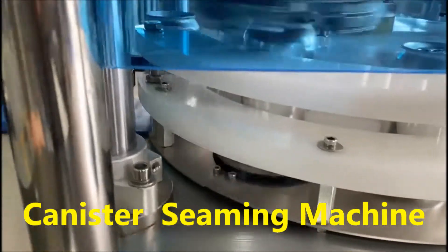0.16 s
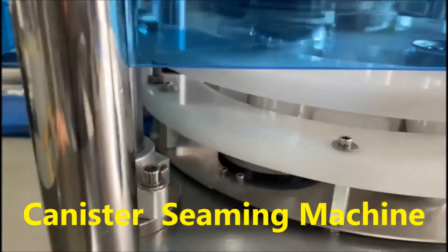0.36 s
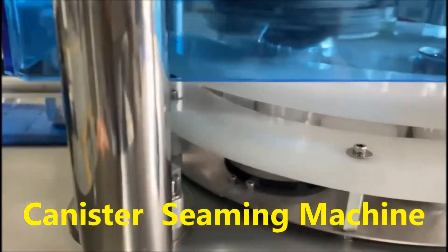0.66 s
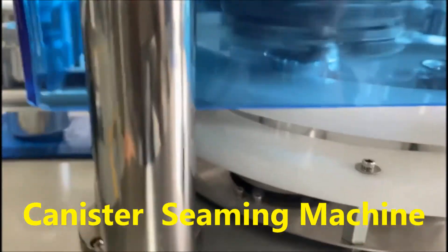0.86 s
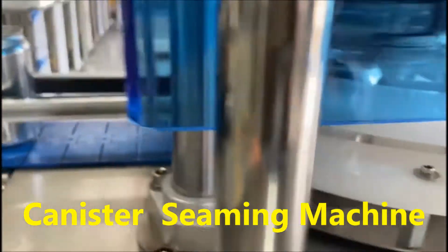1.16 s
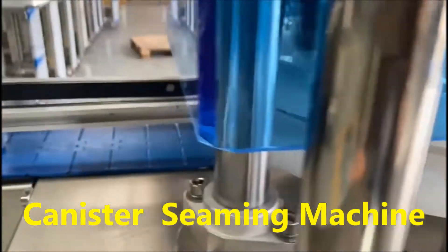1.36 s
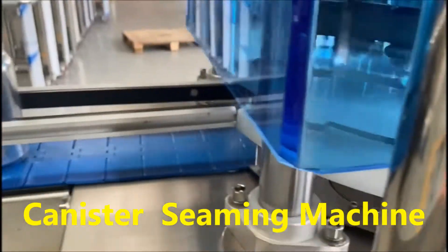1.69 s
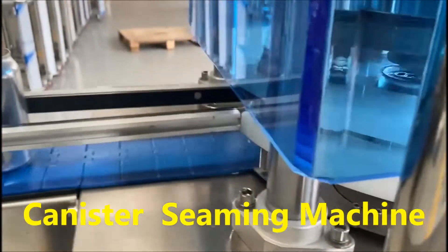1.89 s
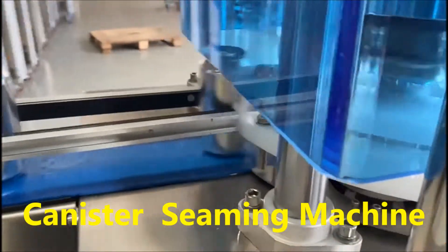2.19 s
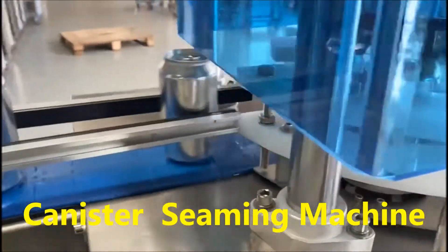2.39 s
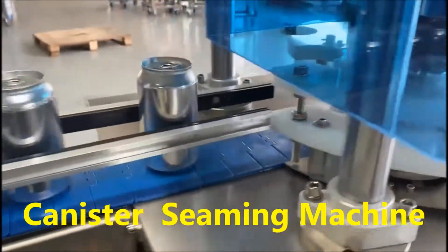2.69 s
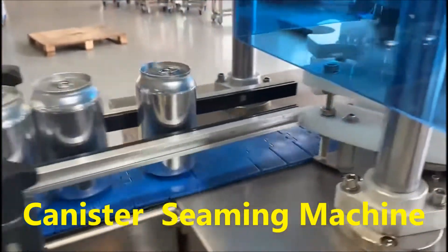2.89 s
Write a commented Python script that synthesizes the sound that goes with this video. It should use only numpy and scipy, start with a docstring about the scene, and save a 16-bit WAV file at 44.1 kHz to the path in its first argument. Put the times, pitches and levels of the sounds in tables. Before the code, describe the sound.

A can seaming machine hums and rattles up close, with an air blast and metallic clanks

```python
"""A can seaming machine runs in a factory hall, heard from close by.
Throughout, a motor hums in sines, the drive drones as resonant noise and a tone, and the conveyor
rattles and hisses in noise. Thuds and clanks of cans and steel parts open the scene as struck bursts.
After a second a valve squeaks and blasts air, noise with exhaust resonances and a sagging whistle;
a thick run of clanks follows, then a thump, and near the end a softer thump, blast and squeak."""
import sys
import numpy as np
from scipy import signal
from scipy.fft import rfft, irfft
from scipy.io import wavfile
from scipy.ndimage import uniform_filter1d, map_coordinates

SR = 44100
rng = np.random.default_rng(int(sys.argv[2]) if len(sys.argv) > 2 else 0)


def unload_wav(signal):
    """Save mono or channel-first audio to the path in sys.argv[1] as 16-bit WAV at rate SR, clipped to [-1, 1]."""
    wavfile.write(
        sys.argv[1],
        SR,
        np.round(np.clip(np.atleast_2d(signal).T, -1, 1) * 32767).astype(np.int16),
    )


N = 134505
TIME, FREQ = np.arange(N) / SR, np.fft.rfftfreq(N, 1 / SR)

# blows of cans and steel parts: start_s, crash_level_db, strongest_hz, crash_t60_s,
# crack_level_db, ring_level_db (the ring is trimmed further in pings)
CLANK_BLOWS = [(0.144, -27, 870, 0.071, -26, -49), (0.182, -31, 760, 0.06, -30, -50),
               (.460, -40, 2100, 0.091, -33, -37.5), (0.638, -48, 2500, 0.053, -42, -46),
               (0.929, -32, 2330, 0.065, -42, -36), (1.026, -33, 1950, 0.49, -58, -41),
               (1.069, -17.5, 1100, 0.03, -17, -36), (1.071, -20, 4670, 0.052, -13.5, -50),
               (1.145, -27, 800, 0.055, -14, -44), (1.431, -40, 2180, 0.42, -44, -49),
               (1.574, -35, 2570, 0.13, -40, -32.5), (1.597, -25, 2420, 0.16, -15, -35),
               (1.601, -34, 5270, 0.11, -28.5, -33), (1.603, -31, 600, 0.086, -24, -50),
               (1.614, -29.5, 3050, 0.25, -22, -28.5), (1.648, -44, 4240, .12, -32, -30),
               (1.701, -28, 680, 0.09, -16, -44), (1.704, -21, 3880, 0.087, -24, -26),
               (1.753, -41, 3600, 0.15, -38, -37), (1.798, -39, 3770, 0.054, -33, -56),
               (1.906, -31.5, 650, 0.044, -23, -44), (2.001, -25.5, 1050, 0.11, -24.5, -21),
               (2.320, -42.5, 2180, 0.18, -49, -45), (2.619, -42, 2270, 0.059, -30, -38.5),
               (2.78, -32.5, 2610, 0.1, -41, -41), (2.926, -40, 985, 0.067, -34, -46),
               (2.957, -41, 1210, 0.16, -24.5, -44)]
# modes the steel rings with: mode_hz, width_hz, relative_level_db, t60_s
STEEL_MODES = [(1040, 61, 8, 0.063), (2180, 68, 12, 0.17), (2450, 56, 0.5, 0.29), (2730, 74, 10, 0.052),
               (2900, 60, 7.5, 0.13), (3240, 43, 2, .16), (3742, 38, 8, 0.24), (3880, 90, 2, 0.045),
               (4630, 76, -7, 0.093), (4800, 80, -5, 0.069), (5420, 85, 11.5, 0.18)]
# spectrum of escaping air and high hiss: frequency_hz, relative_level_db
HISS_SPECTRUM = [(1000, -2.5), (3000, 7.5), (5400, 7.5), (7500, 6.5), (9500, 1), (11000, 1), (14000, -2.5),
                 (16000, -5)]


def amp(db):
    """Decibels to gain."""
    return 10 ** (np.asarray(db) / 20)


def unit(x):
    """Scales to rms 1."""
    return x / np.sqrt(np.mean(x ** 2) + 1e-20)


def at_hz(points, hz=FREQ):
    """Reads a table on a log-frequency axis."""
    f, value = np.transpose(points)
    return np.interp(np.log(hz + 1), np.log(f + 1), value)


def over_time(points):
    """Reads a table along the time axis."""
    return np.interp(TIME, *np.transpose(points))


def drift(hz):
    """Chance movement of rms 1, smoothed so that little is left above this rate."""
    return unit(irfft(rfft(rng.standard_normal(N)) / (1 + (FREQ / hz) ** 4), N))


def colour(gain, source=None, size=N):
    """Two channels of noise (or of a given source) with this spectrum, partly alike, rms 1."""
    # likeness of the two sides: frequency_hz, likeness_0_to_1
    likeness = [(50, .95), (350, .95), (480, .88), (700, .62), (1600, .45), (2600, .7), (4500, .62),
                (5500, .3)]
    a, b = rfft(rng.standard_normal((2, size)) if source is None else source)
    same = np.clip(at_hz(likeness, np.fft.rfftfreq(size, 1 / SR)), 0, 1)
    second = same * a + np.sqrt(1 - same ** 2) * b
    return unit(irfft(np.array([a, second]) * gain, size))


def resonances(table):
    """Noise ringing in steep resonances, each with its own level."""
    peaks = [amp(db) * unit(1 / (1 + (2 * (FREQ - hz) / width) ** 2)) for hz, width, db in table]
    power = np.sum(np.square(peaks), 0)
    return colour(np.sqrt(power)) * np.sqrt(power.mean())


def struck(start, t60, rise_s, time=TIME):
    """Envelope with a quick rise and an exponential decay."""
    t = np.maximum(time - start, 0)
    return np.minimum(t / rise_s, 1) * np.exp(-np.log(1000) * t / t60)


def add(mix, start, sound):
    """Mixes a two-channel sound in at its start time."""
    part = mix[:, round(start * SR):][:, :sound.shape[1]]
    part += sound[:, :part.shape[1]]


def patchy(x, depth_db, size):
    """Turbulence: the level flickers in patches of time and frequency."""
    z = signal.stft(x, nperseg=256)[2]
    field = rng.standard_normal(z.shape[1:])
    field = uniform_filter1d(field, size, axis=0)
    field = unit(uniform_filter1d(field, size, axis=1))
    return signal.istft(z * amp(depth_db * field), nperseg=256)[1][:, :N]


def air_blasts():
    """The valve leaks, sticks half open, surges, blows and shuts; exhaust pitches waver irregularly."""
    # start_s, length_s, level_db
    blasts = [(1.066, 0.2496, -24), (2.927, .245, -28)]
    # spectrum of the bare jet: frequency_hz, relative_level_db
    jet_spectrum = [(300, -38), (700, -17), (1000, -8.5), (1750, -9), (2300, -3.5), (3400, -6), (4400, -9),
                    (5400, -5), (6350, -13.5), (7200, -11), (8100, -0.5), (9300, 3.5), (11000, -3),
                    (12500, -12), (13900, -1), (14900, -11), (15800, -4.5)]
    # exhaust resonances, one list per blast: frequency_hz, width_hz, level_db
    exhaust_pipes = [
        [(910, 58, -25), (1040, 120, -31), (1468, 113, -15), (2130, 200, -21), (2602, 100, -17.5),
         (3000, 100, -29), (3340, 310, -13.5), (3650, 60, -31), (4020, 120, -21), (4970, 82, -16),
         (5500, 150, -16), (5620, 74, -20.5), (5980, 81, -23), (7000, 220, -18.5), (7880, 55, -24),
         (13800, 77, -8.5), (15040, 50, -28)],
        [(950, 280, -17), (1390, 170, -17.5), (2070, 90, -14.5), (2900, 150, -12), (4300, 420, -13),
         (5050, 170, -15), (5600, 600, -11.5), (7240, 870, -8), (14600, 260, -12)],
    ]
    attack_s, release_s = 0.0012, 0.0082
    leak_s, leak_db = 0.054, -16.5
    stick_s, half_open_db = 0.017, -2
    surge_s, surge_db = 0.14, 3.5
    out = np.zeros((2, N))
    # reading the ringing at an uneven speed bends its pitches
    wavering = TIME + 0.005 * np.cumsum(drift(hz=24.3)) / SR
    for (start, length, db), pipe in zip(blasts, exhaust_pipes):
        t = TIME - start
        leak = amp(leak_db) * np.sqrt(np.clip(1 + t / leak_s, 0, 1)) * (t < 0)
        blow = np.clip(t / attack_s, 0, 1) * amp(surge_db * np.exp(-np.maximum(t, 0) / surge_s))
        blow = blow * amp(half_open_db * (t < stick_s))
        shutting = np.exp(-np.maximum(t - length, 0) / release_s)
        flow = amp(db) * (leak + blow) * shutting
        ringing = np.array([map_coordinates(side, [wavering * SR], order=3, mode="mirror")
                            for side in resonances(pipe)])
        jet = colour(amp(at_hz(jet_spectrum)))
        out += flow * (jet + ringing)
    return out * amp(0.17 * drift(hz=123))


def whistle():
    """A rough tone in the first blast that sags with the air pressure."""
    # time_s, pitch_hz, level_db
    sag = [(1.072, 939.6, -36), (1.11, 926, -39), (1.18, 924, -41.5), (1.26, 905, -41.5), (1.29, 899, -37),
           (1.31, 900, -43), (1.33, 900, -51)]
    s, hz, db = np.transpose(sag)
    wander_hz = 19.4 * drift(hz=80)
    turns = np.cumsum(np.interp(TIME, s, hz) + wander_hz) / SR
    level = np.interp(TIME, s, amp(db), 0, 0)  # silent outside the table
    roughness = amp(2.9 * drift(hz=60))
    return level * roughness * np.sqrt(2) * np.sin(2 * np.pi * turns)


def squeaks():
    """Brief rough tones as the valve moves, with wandering pitch and a phase offset between sides."""
    # start_s, length_s, pitch_hz, level_db
    valve_tones = [(1.06, 0.011, 14110, -20.5), (1.087, 0.017, 15500, -24), (1.0937, 0.01, 2854, -14.5),
                   (2.953, 0.0083, 2876, -22)]
    out = np.zeros((2, N))
    rough = 1 + 0.04 * drift(hz=600)
    wander_hz = 75 * drift(hz=185)
    side_turns = 0.064 * np.array([[1], [0]])
    for start, length, hz, db in valve_tones:
        u = np.clip((TIME - start) / length, 0, 1)
        swell = np.sqrt(8 * u * (1 - u))
        turns = np.cumsum(hz + wander_hz) / SR + side_turns
        out += amp(db) * swell * rough * np.sin(2 * np.pi * turns)
    return out


def thumps():
    """The mechanism's low decaying thuds, each with a puff of air, and knocks that ring the frame."""
    # start_s, thud_level_db, puff_level_db
    thuds = [(0.04, -18, -36), (1.061, -17, -33), (1.896, -26, -38.5), (2.887, -25, -39)]
    # start_s, level_db
    frame_knocks = [(0.691, -26), (1.151, -36), (1.607, -26), (3.005, -32)]
    thud_hz, thud_t60_s, puff_t60_s = 55.6, 0.1, 0.42
    knock_hz, knock_t60_s = 312, 0.37
    out = np.zeros((2, N))
    puff = colour(amp(at_hz(HISS_SPECTRUM)) * (FREQ / 8000) ** 0.17)
    for start, db, puff_db in thuds:
        thud = np.sin(2 * np.pi * thud_hz * (TIME - start))
        out += amp(db) * struck(start, thud_t60_s, rise_s=0.0076) * thud
        out += amp(puff_db) * struck(start, puff_t60_s, rise_s=0.0042) * puff
    for start, db in frame_knocks:
        knock = np.sin(2 * np.pi * knock_hz * (TIME - start))
        out += amp(db) * struck(start, knock_t60_s, rise_s=0.0006) * knock
    return out


def clanks():
    """Each blow is a crack and a chattering crash around one pitch, coloured by the modes of the steel."""
    # colour shared by all clanks: frequency_hz, relative_level_db
    shared_colour = [(100, 18), (500, 7), (1200, 3.5), (1700, -1.5), (2300, -2.5), (5500, -3), (8000, -8.5),
                     (15000, -9)]
    focus_db, focus_octaves, tilt_db_per_octave = 8, 0.28, -2
    out, t = np.zeros((2, N)), TIME[:SR // 2]
    f = np.fft.rfftfreq(len(t), 1 / SR)
    modes = sum(amp(db) / (1 + (2 * (f - hz) / width) ** 2) for hz, width, db, _ in STEEL_MODES)
    for start, db, hz, t60, crack_db, _ in CLANK_BLOWS:
        octaves = np.log2((f + 20) / hz)
        focus = focus_db * np.exp(-(octaves / focus_octaves) ** 2)
        shape = amp(at_hz(shared_colour, f) + focus + tilt_db_per_octave * abs(octaves))
        crash = amp(db) * struck(0, t60, rise_s=0.0059, time=t)
        crack = amp(crack_db) * struck(0, 0.012, rise_s=0.0013, time=t)
        add(out, start, (crash + crack) * colour(shape * np.hypot(1, modes), size=len(t)))
    chatter = unit(amp(1.4 * drift(hz=261)))
    return out * chatter


def pings():
    """The modes of the steel nearest to each blow's pitch ring on, roughened as the parts jostle."""
    trim_db, reach_octaves = -15.5, 0.36
    detune, side_turns = 0.003, 0.097  # chance spread: share of the pitch, turns of phase
    out, t = np.zeros((2, N)), TIME[:SR // 3]
    jostle = np.cumsum(21.4 * drift(hz=152)) / SR  # phase in turns
    for start, _, hz, _, _, ring_db in CLANK_BLOWS:
        for mode_hz, _, db, t60 in STEEL_MODES:
            near = np.exp(-(np.log2(mode_hz / hz) / reach_octaves) ** 2)
            turns = mode_hz * (1 + detune * rng.standard_normal()) * t + rng.random()
            turns = turns + side_turns * rng.standard_normal((2, 1))
            turns = turns + jostle[rng.integers(N - len(t)):][:len(t)]
            level = near * amp(ring_db + db + trim_db)
            add(out, start, level * struck(0, t60, rise_s=0.0025, time=t) * np.sin(2 * np.pi * turns))
    return out * unit(amp(4 * drift(hz=110)))


def drive():
    """The turning drive rumbles, rings the frame and sings one wavering tone."""
    # body level before its trim: time_s, level_db
    body_level = [(0.0, -28), (0.17, -29), (0.3, -31.5), (0.7, -30), (1.0, -30.5), (1.12, -31), (1.16, -27),
                  (1.28, -35), (1.38, -41), (1.45, -33), (1.58, -30), (1.66, -33), (2.55, -32.5),
                  (2.72, -31.5), (2.97, -36.5), (3.01, -27), (3.05, -29)]
    # broad rumble: frequency_hz, relative_level_db
    rumble_spectrum = [(20, -28), (45, -46), (80, 10.5), (140, -1), (200, -1), (290, 7), (370, 3),
                       (470, -3.5), (700, -16), (1500, -46.5)]
    # frame resonances: frequency_hz, width_hz, level_db (relative to the body level)
    frame_modes = [(170.4, 38, -20.5), (228.5, 12, -11), (302, 40, -9), (330.6, 20, -14),
                   (500.5, 26, -19.5)]
    # clear tone before its trim: time_s, level_db
    tone_level = [(0.0, -31), (0.07, -51), (0.14, -29.5), (0.45, -42.5), (0.53, -36.5), (0.65, -36.5),
                  (0.71, -29), (0.87, -38.5), (0.98, -29.5), (1.1, -49), (1.38, -51.5), (1.55, -49),
                  (1.88, -34.5), (2.05, -41.5), (2.6, -39.5), (3.05, -44.5)]
    rumble_db, body_trim_db, tone_trim_db = -6, -0.5, -1
    turns = np.cumsum(321.2 + 3.45 * drift(hz=8.46)) / SR  # centre and wander in Hz
    flutter_db = 1 * drift(hz=17)
    tone = np.sqrt(2) * np.sin(2 * np.pi * turns)
    tone = tone * amp(over_time(tone_level) + tone_trim_db + flutter_db)
    body = amp(rumble_db) * colour(amp(at_hz(rumble_spectrum))) + resonances(frame_modes)
    shudder_db = 0.65 * drift(hz=15.0)
    return tone + body * amp(shudder_db + over_time(body_level) + body_trim_db)


def conveyor():
    """Chain links and cans rattle in a dense wash with small ticks, under a high hiss."""
    # level of wash and ticks together: time_s, level_db
    rattle_level = [(0, -38.5), (.18, -35), (.32, -40.5), (.7, -39), (1.06, -38.5), (1.2, -43), (1.36, -49),
                    (1.47, -41), (1.63, -35.5), (1.85, -38), (2.3, -41), (2.85, -39.5), (3.05, -36)]
    # frequency_hz, relative_level_db
    rattle_spectrum = [(200, 5), (450, 0), (750, 4), (1200, -2), (1750, -7), (2300, -4), (2900, -12),
                       (4500, -15.5), (8000, -30), (16000, -59)]
    # time_s, level_db
    hiss_level = [(0, -49), (.2, -51.5), (.26, -46.5), (.38, -56.5), (.6, -59.5), (1, -59), (1.38, -55),
                  (1.48, -49.5), (1.68, -46), (1.85, -55.5), (2.05, -48), (2.5, -44.5), (2.85, -52),
                  (3.05, -49)]
    wash_db, ticks_db, ticks_per_s, tick_decay_s = -1, -10, 110, 0.0046
    ticks = (rng.random(N) < ticks_per_s / SR) * rng.uniform(0.47, 1, N)
    tick_envelope = signal.lfilter([1], [1, -np.exp(-1 / (tick_decay_s * SR))], ticks)
    grains = tick_envelope * rng.standard_normal((2, N))
    shape = amp(at_hz(rattle_spectrum))
    rattle = amp(wash_db) * colour(shape) + amp(ticks_db) * colour(shape, grains)
    hiss = colour(amp(at_hz(HISS_SPECTRUM))) * amp(over_time(hiss_level) + 0.28 * drift(hz=40))
    return rattle * amp(over_time(rattle_level)) + hiss


def motor():
    """Mains hum: two sines, wavering slightly."""
    # frequency_hz, relative_level_db
    hum_lines = [(100.1, -10), (200.2, -20.5)]
    # level before its trim: time_s, level_db
    hum_level = [(0.0, -48), (0.04, -37.5), (1.1, -33.5), (1.21, -42.5), (1.42, -42), (1.45, -36.5),
                 (2.28, -37.5), (2.39, -34), (3.01, -35), (3.05, -40)]
    trim_db = 0.5
    wavering = TIME + 0.00019 * drift(hz=0.58)
    tone = sum(amp(db) * np.sin(2 * np.pi * (hz * wavering + rng.random())) for hz, db in hum_lines)
    return unit(tone) * amp(over_time(hum_level) + trim_db)


def guard(x):
    """Dense early echoes between the guard panels give a hollow, uneven colour."""
    echo_t60_s, echo_db = 0.08, -13
    t = TIME[:SR // 10]
    echoes = rng.standard_normal((2, len(t))) * np.exp(-np.log(1000) * t / echo_t60_s)
    inside = signal.fftconvolve(x, echoes / np.linalg.norm(echoes[0]), axes=1)[:, :N]
    inside = signal.sosfilt(signal.butter(2, 1200, "high", fs=SR, output="sos"), inside)
    return (x + amp(echo_db) * inside) / np.hypot(1, amp(echo_db))


def hall(x):
    """A diffuse noise tail whose decay time depends on frequency, longest in the bass."""
    # frequency_hz, t60_s
    decay = [(200, 1), (2000, 0.25), (6000, 0.34), (14000, 0.12)]
    hz, t, z = signal.stft(rng.standard_normal((2, SR)), SR, nperseg=256)
    fading = np.exp(-np.log(1000) * t / at_hz(decay, hz)[:, None])
    tail = signal.istft(z * fading, SR, nperseg=256)[1]
    tail = tail / np.linalg.norm(tail[0])
    tail = signal.lfilter([.4], [1, -.6], tail)  # softens the treble
    return signal.fftconvolve(x, tail, axes=1)[:, :N]


def scene():
    """The running machine with the events of its cycle; only the events feed the hall."""
    blasts = guard(patchy(air_blasts(), depth_db=2, size=4))
    events = blasts + whistle() + clanks() + pings() + squeaks() + thumps()
    running = motor() + drive() + patchy(conveyor(), depth_db=1, size=4)
    return running + events + amp(-13) * hall(events)


def record(dry):
    """The treble is nearly one signal, shifted in phase between the sides; then the band limits."""
    # phase of the right side in the treble: frequency_hz, phase_half_turns
    treble_phase = [(7450, 0), (8550, 1), (9600, 1), (10400, 2), (11850, 2), (12500, 3), (13900, 3),
                    (14650, 4)]
    # how far the left side leads: frequency_hz, lead_radians
    left_lead = [(30, -.2), (60, -.45), (100, -.65), (160, -.25), (320, -.35), (900, -.25), (1900, -.5),
                 (3000, .4), (4200, 0), (6000, 0)]
    # left gain over right gain: frequency_hz, balance_db
    balance = [(60, 1.6), (300, 1.6), (600, 1.5), (2400, 0.76), (4500, 2.1), (7000, 0.43)]
    mono_hz, low_cut_hz, edge_hz = 6420, 74, 15750
    left, right = rfft(dry)
    merge = np.clip((FREQ - mono_hz) / 400 + .5, 0, .85) * np.pi / 2
    right = np.cos(merge) * right + np.sin(merge) * left
    right = right * np.exp(1j * np.pi * np.interp(FREQ, *np.transpose(treble_phase)))
    right = right * np.exp(-1j * at_hz(left_lead))
    lean = amp(at_hz(balance) / 2)
    low_cut = FREQ ** 2 / np.hypot(FREQ ** 2, low_cut_hz ** 2)
    pair = irfft(np.array([left * lean, right / lean]) * low_cut, N)
    high_cut = signal.firwin(511, edge_hz, window=("kaiser", 9), fs=SR)
    return signal.oaconvolve(pair, high_cut[None], "same")


dry = scene()
out = record(dry)
unload_wav(out)
```